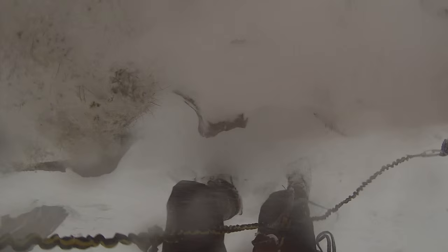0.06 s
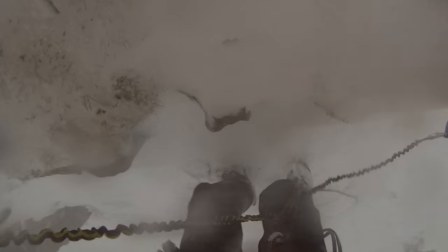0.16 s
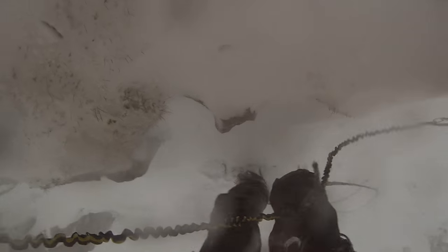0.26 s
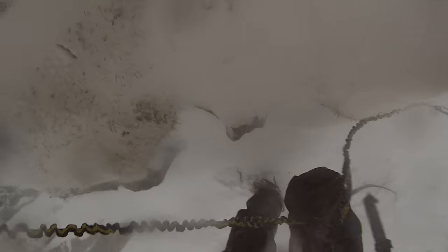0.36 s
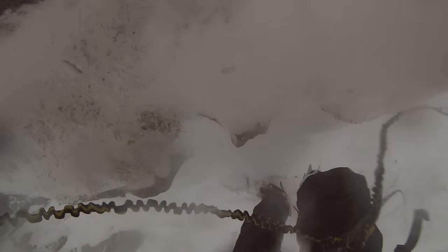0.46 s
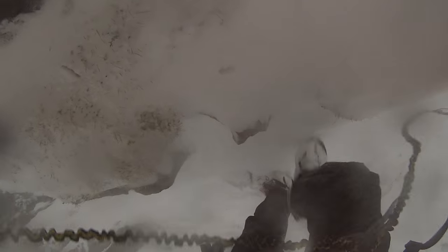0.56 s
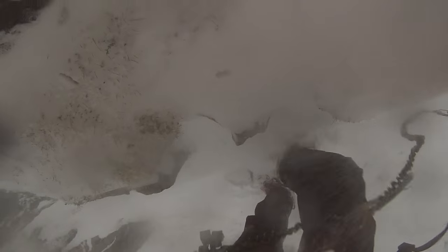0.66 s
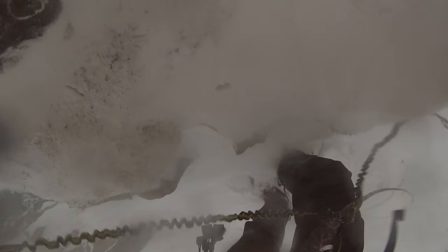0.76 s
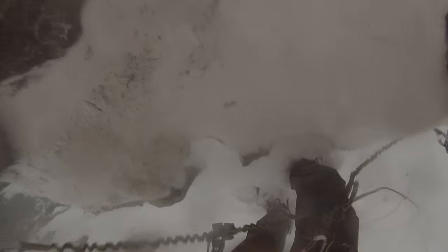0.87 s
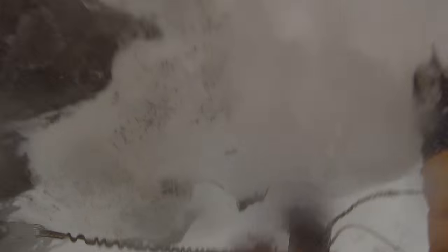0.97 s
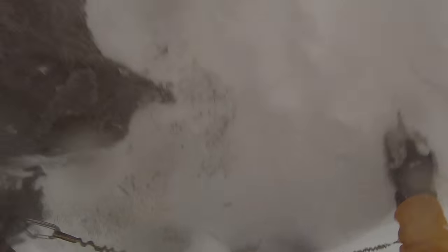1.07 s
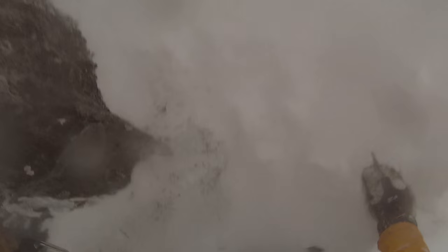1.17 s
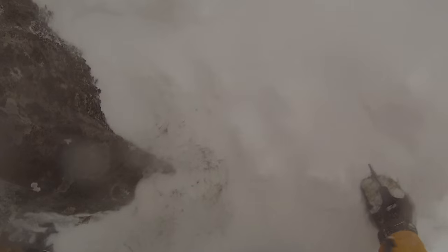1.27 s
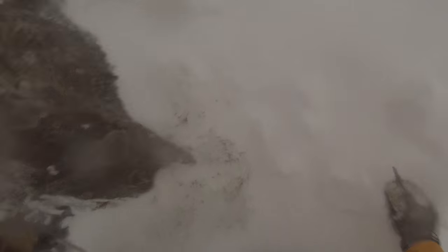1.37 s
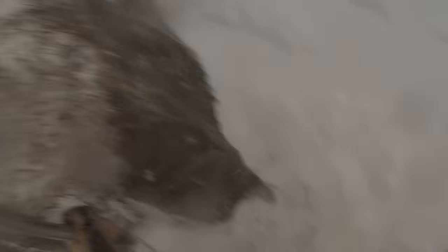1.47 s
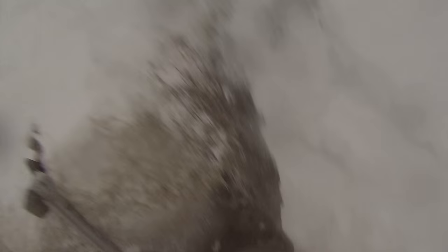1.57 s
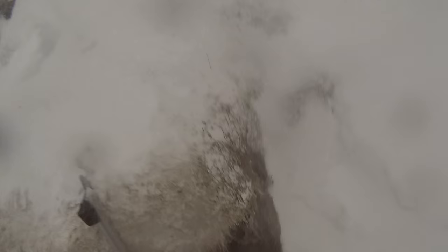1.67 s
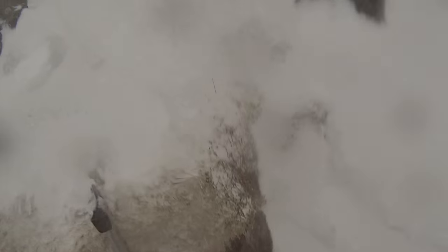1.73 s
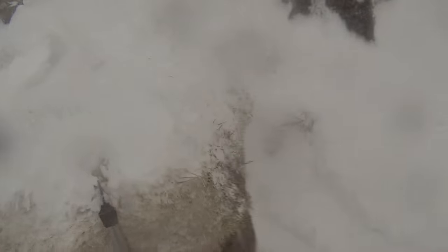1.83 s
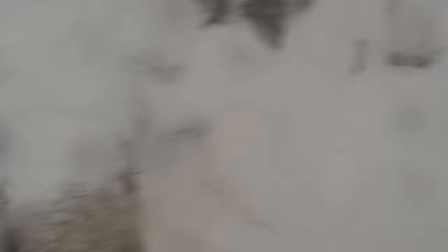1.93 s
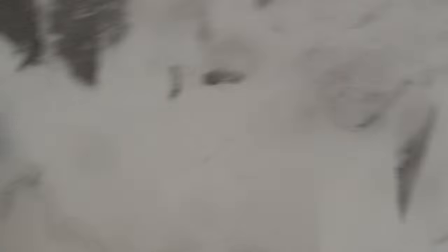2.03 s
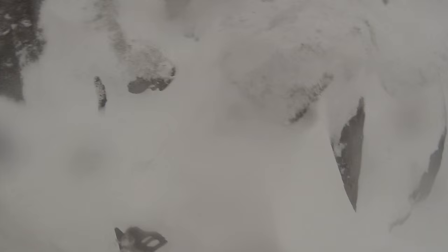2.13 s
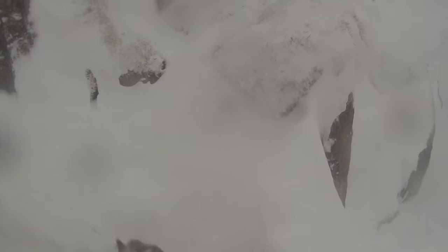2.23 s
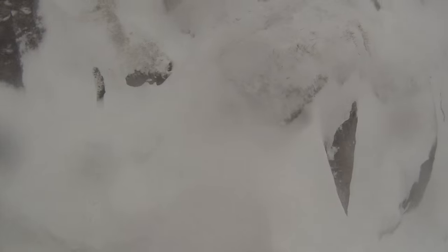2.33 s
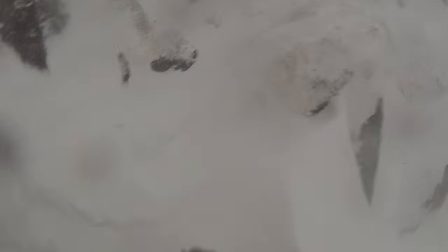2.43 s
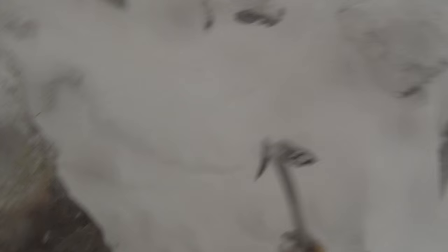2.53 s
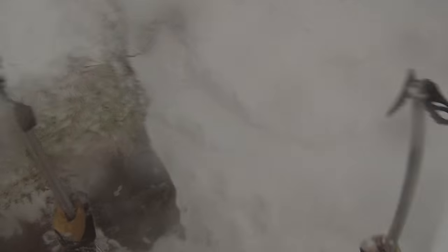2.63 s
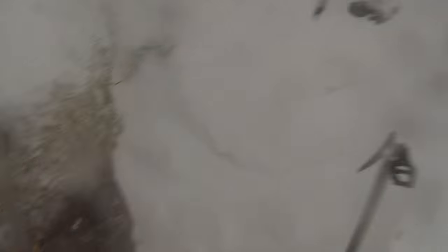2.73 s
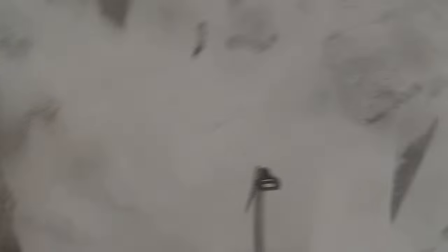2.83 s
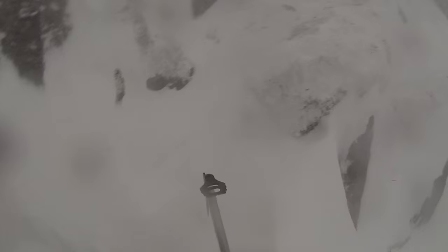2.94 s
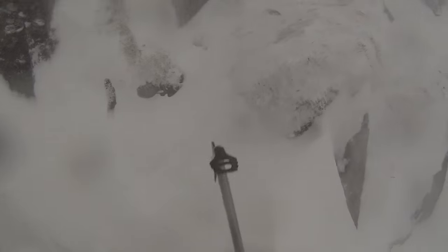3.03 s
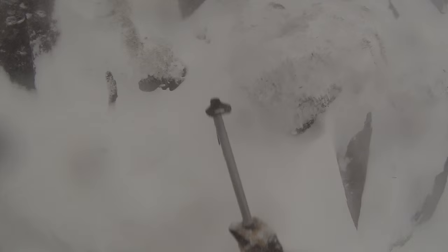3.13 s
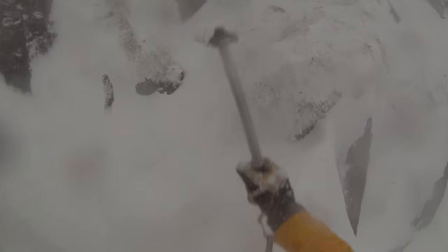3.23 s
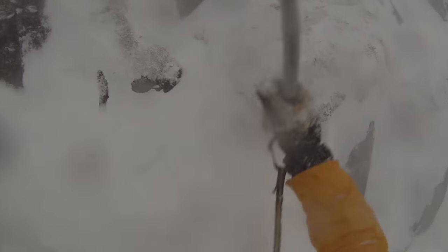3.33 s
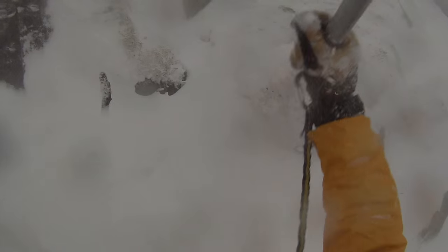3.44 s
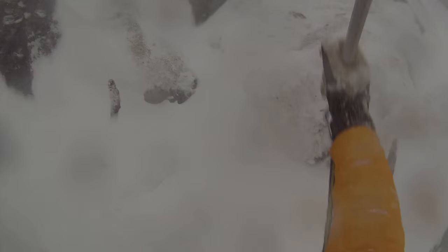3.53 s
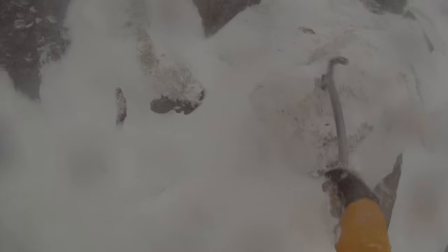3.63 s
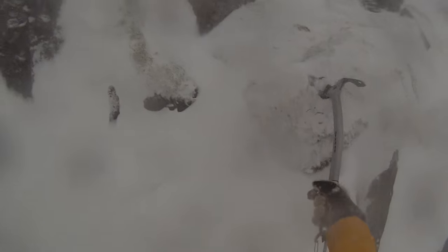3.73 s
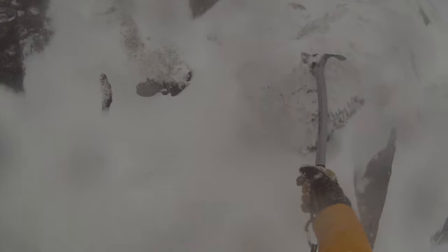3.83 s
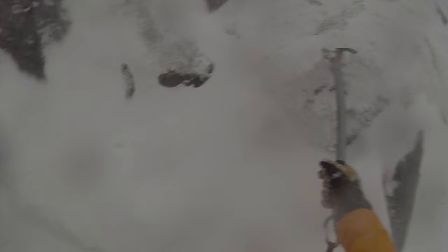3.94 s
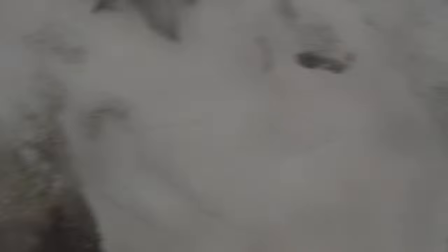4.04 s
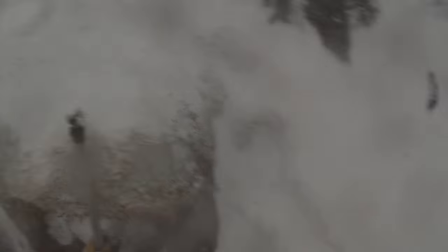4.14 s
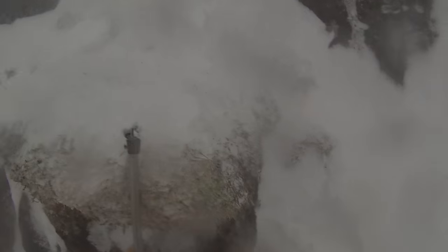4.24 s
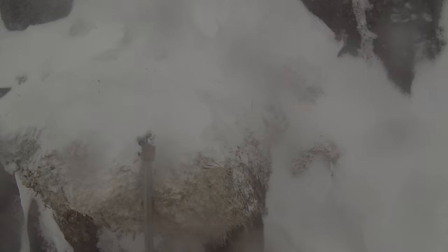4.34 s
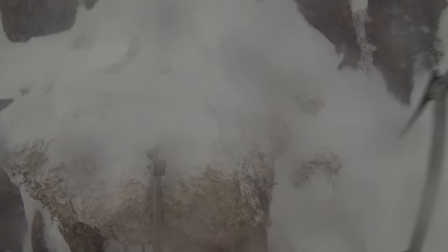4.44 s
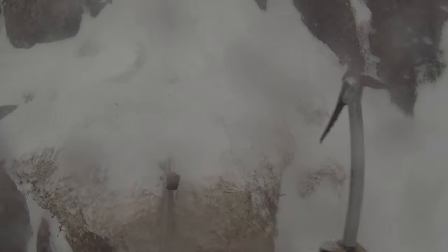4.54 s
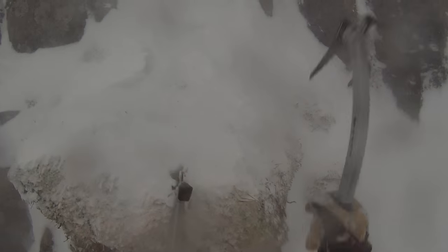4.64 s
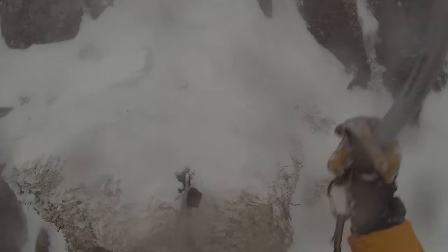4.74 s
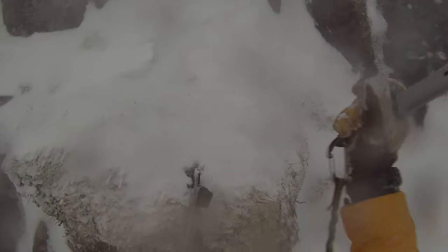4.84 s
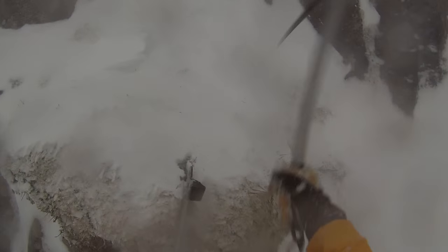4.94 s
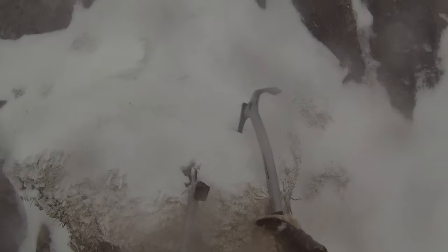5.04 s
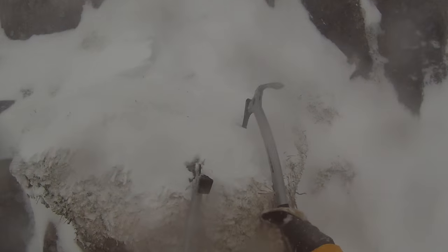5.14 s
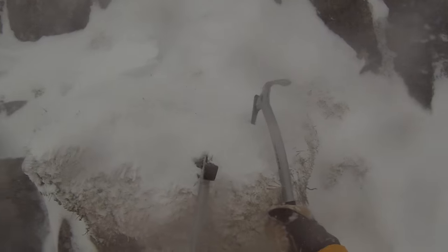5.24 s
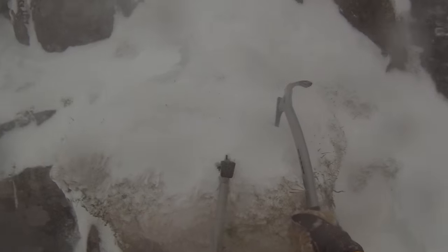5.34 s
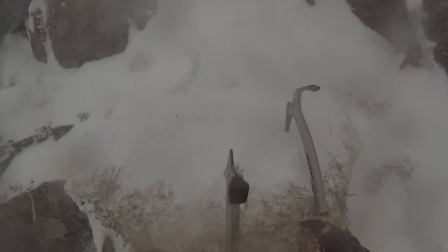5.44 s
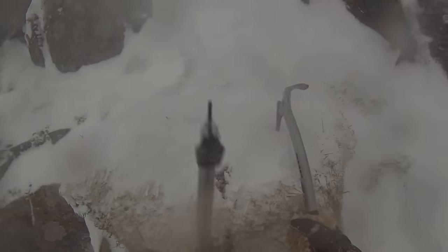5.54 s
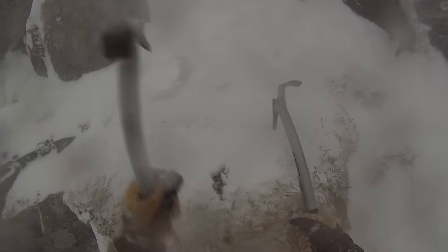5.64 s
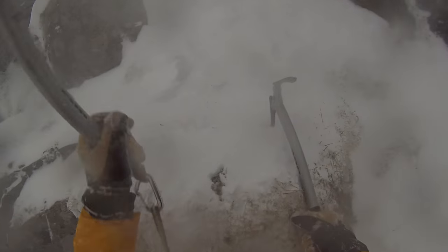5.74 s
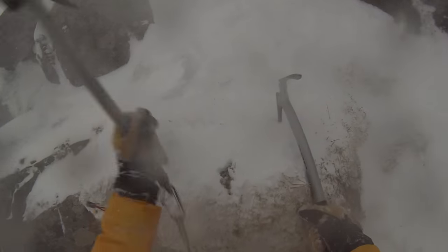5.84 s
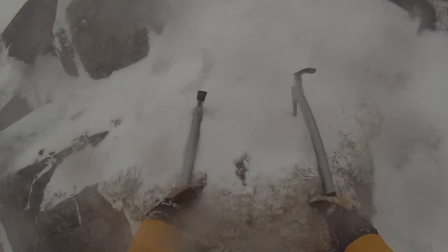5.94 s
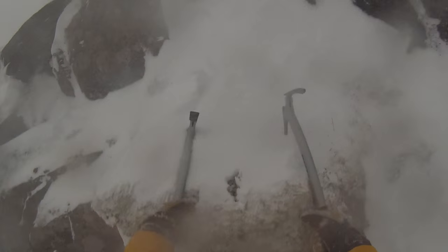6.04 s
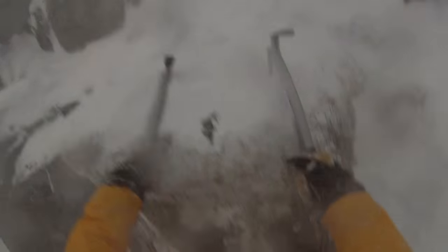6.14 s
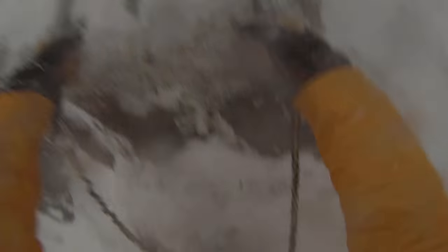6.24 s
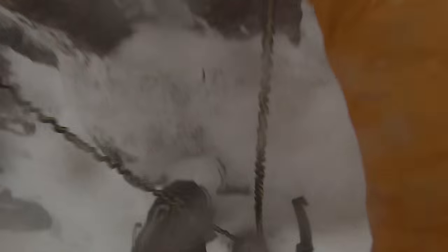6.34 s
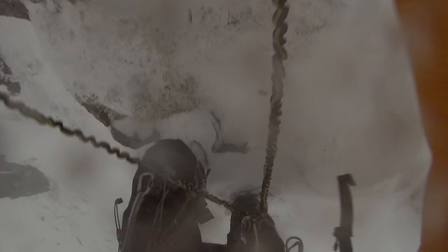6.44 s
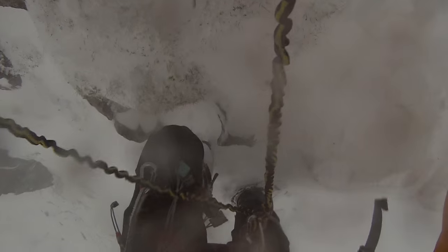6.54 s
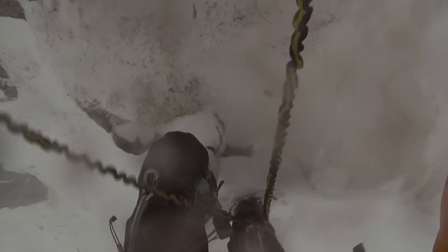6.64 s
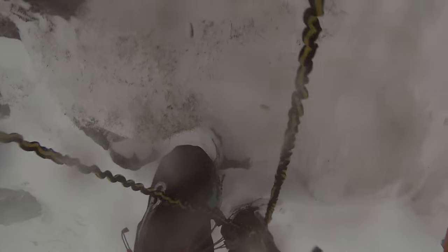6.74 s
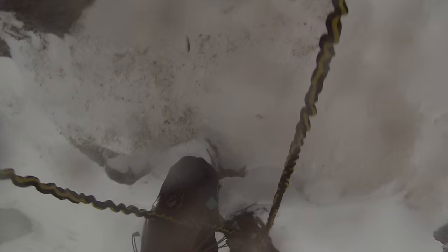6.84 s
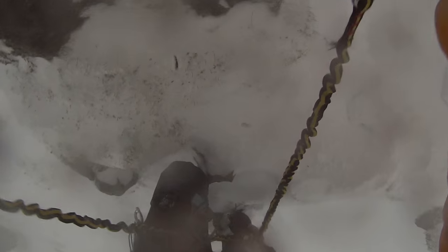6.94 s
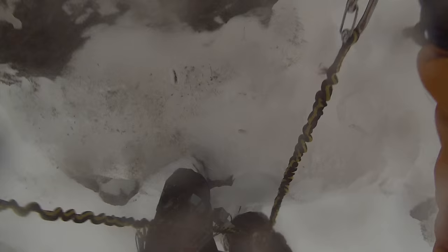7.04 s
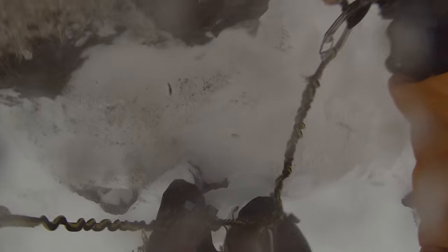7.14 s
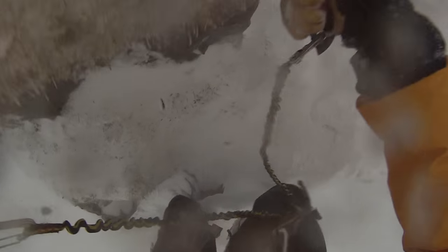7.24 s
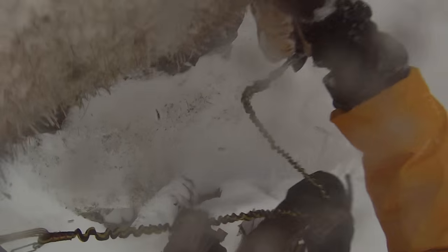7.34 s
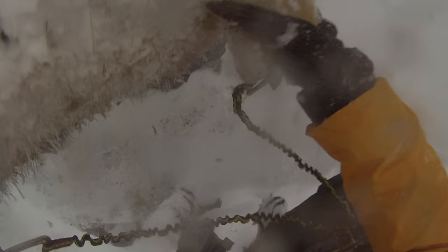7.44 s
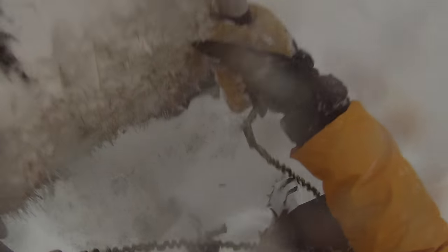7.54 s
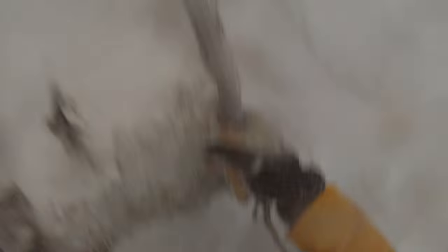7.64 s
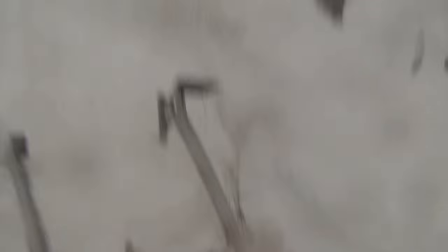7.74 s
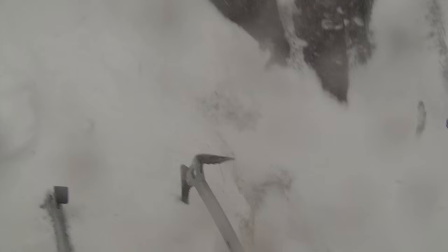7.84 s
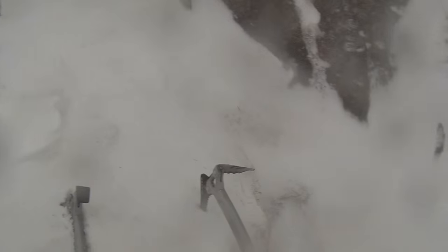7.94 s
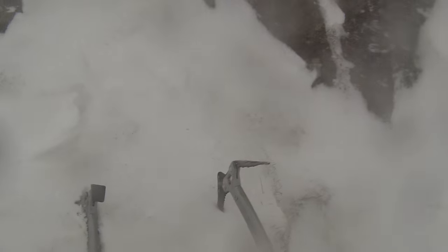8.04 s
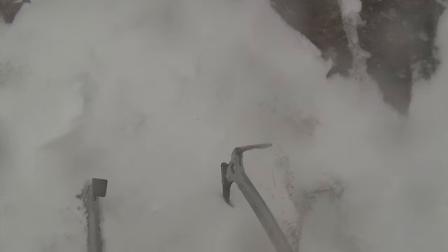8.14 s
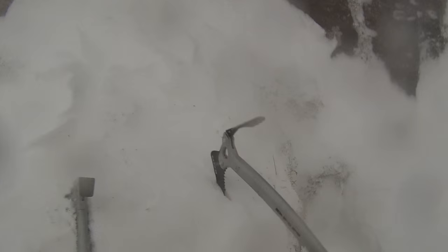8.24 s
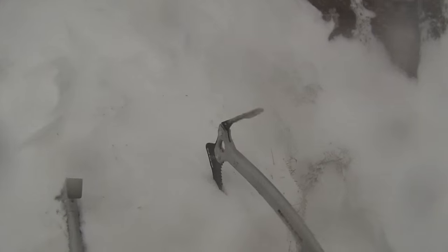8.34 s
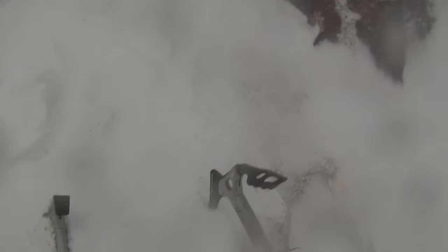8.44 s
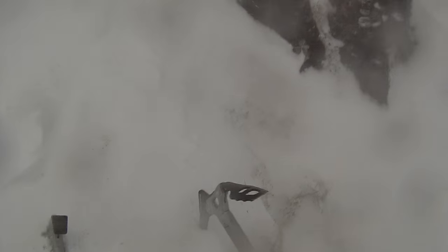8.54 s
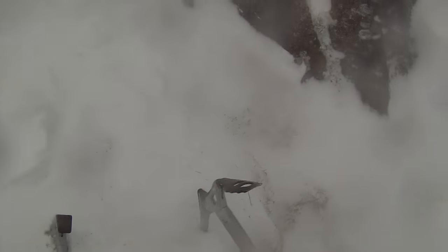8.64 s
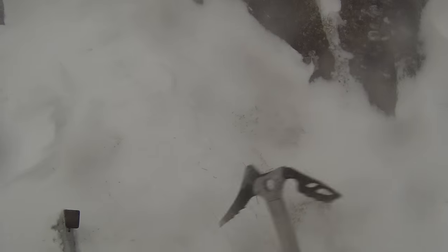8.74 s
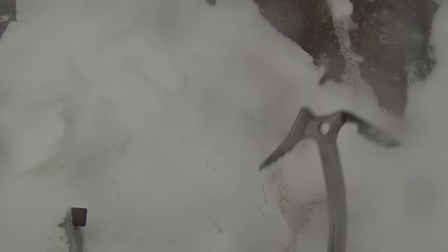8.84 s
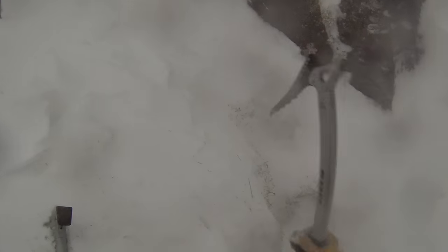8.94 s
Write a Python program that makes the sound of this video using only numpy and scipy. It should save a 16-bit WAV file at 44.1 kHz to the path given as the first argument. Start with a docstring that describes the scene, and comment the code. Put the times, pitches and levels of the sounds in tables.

```python
"""A climber works up frozen snow and turf with two ice axes, heard from a camera worn on the body.
From the start, strokes of crunching snow and stiff cloth (tiny fractures over noise) ride on rumbling wind
(shaped noise), while picks and ice chips click (short ringing modes). Duller blows soon land in the turf
(swelling noise bursts); then jolts and heaves of the body boom in the camera mount near one low note.
The hardest jolt comes two thirds of the way through, and the moves go on to the end."""
import sys
import numpy as np
from scipy import signal
from scipy.fft import rfft, irfft, next_fast_len
from scipy.io import wavfile
from scipy.ndimage import uniform_filter1d, map_coordinates

SR = 44100
rng = np.random.default_rng(int(sys.argv[2]) if len(sys.argv) > 2 else 0)


def inscribe(sig):
    """Save sig as 16-bit PCM at rate SR to the path in sys.argv[1].

    A 1-D sig is mono; a 2-D sig holds one channel per row.
    Samples are clipped to [-1, 1] before scaling.
    """
    pcm = np.round(np.clip(np.atleast_2d(sig).T, -1, 1) * 32767)
    wavfile.write(sys.argv[1], SR, pcm.astype(np.int16))


N = 396900  # samples: 9 s

# Colour of crisp snow, in the strokes and in the crumbling after a click: (frequency [Hz], level [dB])
CRISP_COLOUR = [(1200, -44), (2500, -3.5), (3800, -5.5), (4500, -4.5), (5000, -0.5), (5500, -4),
                (6100, -12), (8000, -12.5), (15300, -20.5)]


def amp(db):
    """Decibels to gain."""
    return 10 ** (np.asarray(db) / 20)


def unit(x):
    """x at rms 1."""
    return x / np.sqrt(np.mean(x ** 2) + 1e-20)


def noise():
    """White noise as long as the scene."""
    return rng.standard_normal(N)


def curves(rows):
    """One value per sample for each column after the time."""
    s, *columns = np.transpose(rows)
    return [np.interp(np.arange(N) / SR, s, column) for column in columns]


def wobble(rate):
    """A smooth random curve, rate knots a second."""
    knots = rng.standard_normal(int(N * rate / SR) + 4)
    return map_coordinates(knots, [np.arange(N) * rate / SR])


def coloured(x, spectrum):
    """x through a causal minimum-phase filter with the given (Hz, dB) points, at rms 1."""
    m = 2 * next_fast_len(N // 2 + 8192)
    hz, db = np.transpose(spectrum)
    gain = amp(np.interp(np.log(np.fft.rfftfreq(m, 1 / SR) + 1), np.log(hz), db))
    # folding the cepstrum onto positive time makes the filter causal
    cepstrum = irfft(np.log(gain))
    cepstrum[1:m // 2] *= 2
    cepstrum[m // 2 + 1:] = 0
    response = np.exp(rfft(cepstrum))
    return unit(irfft(rfft(x, m) * response)[:N])


def add(track, s, sound):
    """Mix a sound into the track at s seconds."""
    start = round(s * SR)
    track[start:start + len(sound)] += sound[:N - start]


def swell(start, length, attack_s, t60):
    """Envelope of one movement: it rises, holds and dies away."""
    age = np.arange(N) / SR - start
    rise = np.clip(age / attack_s, 0, 1)
    return rise * amp(-60 * np.maximum(age - length, 0) / t60)


def effort():
    """Body, crisp and sparkle levels [dB] before trim: strokes add in power to the blown snow."""
    # Strokes of boot, pick or sleeve over the snow: (start [s], length [s], body level [dB],
    # crispness over the body [dB], sparkle over the crispness [dB])
    strokes = [(-0.068, 0.091, -39.5, 2.2, -6), (0.036, 0.15, -53, 3.5, -4), (0.43, 0.069, -53.5, 7, 2.5),
               (0.7, 0.12, -62, -2, 4), (0.82, 0.27, -52, 2, -3.5), (1.037, 0.28, -46.5, 0.4, -3),
               (1.396, 0.1, -43.5, 0.8, -11), (1.467, 0.18, -48, -4, -2.6), (1.701, 0.11, -49, 2, -7),
               (1.778, 0.18, -54.5, -3, -0.5), (1.94, 0.292, -48.5, -5, 0), (2.243, 0.23, -41, -0.5, -3),
               (2.453, 0.21, -48, 0, -4.5), (2.668, 0.201, -39.5, -3, -2), (2.931, 0.081, -36, -3.5, 1),
               (3.097, 0.091, -38, -3.5, -0.1), (3.192, 0.087, -41, -0.5, 0),
               (3.282, 0.091, -41, -2.5, 5.5), (3.363, 0.21, -47.3, -6.4, -3), (3.501, 0.2, -38, -2.5, 0),
               (3.72, 0.18, -42, -0.5, -1.5), (3.846, 0.15, -36, -5.5, 3), (3.976, 0.098, -43, -4.1, -3.2),
               (4.082, 0.26, -46.5, -0.5, -1), (4.388, 0.29, -43, -2.2, 1.3), (4.526, 0.19, -37, -5, 0),
               (4.698, 0.14, -46.5, -7.5, -0.5), (4.879, 0.19, -46, -2.5, -2.5),
               (5.088, 0.26, -48.5, 0.3, -3.5), (5.294, 0.17, -48, 1.5, -3), (5.431, 0.14, -41, -0.1, -1.2),
               (5.593, 0.14, -44, 2.2, -1.5), (5.73, 0.17, -47, 2.2, -3.5),
               (5.924, 0.18, -43.5, -1.2, -2.2), (6.08, 0.22, -54, 2, -2), (6.19, 0.17, -45.5, -2, -5.5),
               (6.31, 0.19, -56, 1.8, -5), (6.558, 0.77, -55.5, 5.5, -6.5), (6.91, 0.29, -51, 0.2, -0.5),
               (7.135, 0.11, -50.0, -13.8, -12), (7.267, 0.14, -47, 0.6, -4), (7.418, 0.08, -50, 2, -6),
               (7.586, 0.2, -52.5, -0.8, -3), (7.672, 0.22, -50, -1, -5), (7.992, 0.24, -46, -2.5, -1.5),
               (8.25, 0.044, -32.5, -4.5, -2), (8.437, 0.16, -49.5, -0.5, -2),
               (8.636, 0.066, -37.5, -4.5, 1), (8.74, 0.14, -35.5, -4.5, 0.5), (8.897, 0.103, -43, -7, -21)]
    # Faint hiss of blown snow under the strokes: (time [s], level [dB])
    drift = [(0, -60), (6.2, -60), (6.6, -64), (9, -64)]
    drift_db, = curves(drift)
    drift_steps_db = [0, -5, -3]  # body, crispness over it, sparkle over that
    power = amp(np.cumsum(drift_steps_db))[:, None] ** 2 * amp(drift_db) ** 2
    for start, length, *steps_db in strokes:
        envelope = swell(start, length, attack_s=0.091, t60=0.25)
        power += amp(np.cumsum(steps_db))[:, None] ** 2 * envelope ** 2
    return 10 * np.log10(power)


def slips(rate, settle_s):
    """Stick-slip strength, mean 0 and rms 1: it jumps at each slip and then settles."""
    kicks = (rng.random(N) < rate / SR) * rng.uniform(0.15, 1, N)
    stress = signal.lfilter([1], [1, -np.exp(-1 / (settle_s * SR))], kicks)
    return unit(stress - np.mean(stress))


def grains(rate, spread_db, low_hz, high_hz, life):
    """Tiny fractures at random moments, each at its own pitch: many weak, a few strong."""
    when, pitch, strength, phase = rng.random((int(rate * N / SR), 4)).T[:, :, None]
    k = np.arange(128)
    age = k / SR / life  # in lifetimes; life is in seconds
    size = amp(spread_db * np.minimum(-np.log(1 - strength), 5))
    hz = low_hz + pitch * (high_hz - low_hz)
    wave = size * age * np.exp(-age) * np.sin(2 * np.pi * (hz * k / SR + phase))
    places = (when * N).astype(int) + k
    return unit(np.bincount(places.ravel(), wave.ravel(), N)[:N])


def patchy(x, depth_db, size):
    """Each clump of snow has its own colour: random gains smoothed over (170 Hz bins, 3 ms steps)."""
    z = signal.stft(x, nperseg=256)[2]
    field = uniform_filter1d(rng.standard_normal(z.shape), size[0], axis=0)
    field = uniform_filter1d(field, size[1], axis=1)
    return unit(signal.istft(z * amp(depth_db * unit(field)), nperseg=256)[1][:N])


def crunch(body_db, crisp_db, sparkle_db):
    """Snow crystals break in clumps over the smooth hiss of sliding cloth and blown snow."""
    # Colour of the crunch's body: (frequency [Hz], level [dB])
    body_colour = [(150, -43), (300, -18), (550, -18.5), (870, -21.5), (1030, -6), (1180, -13.5), (1370, 0),
                   (1900, 0), (2300, -3), (3200, -10), (4500, -9.5), (8000, -41)]
    # Colour of the finest crystals: (frequency [Hz], level [dB])
    sparkle_colour = [(4000, -23), (6200, -1.5), (7200, 1.5), (8400, -7.5), (9800, -4.5), (11000, -1),
                      (12300, -8.5), (13800, -11), (15300, -26)]
    # under a hard push the fractures merge into a rush; in light moves they stand out singly
    apart = amp(-.25 * (body_db - np.mean(body_db)))
    clumps_db = apart * (1.28 * slips(rate=90, settle_s=0.0072) + 1.03 * wobble(24))
    coarse = grains(rate=850, spread_db=3.5, low_hz=880, high_hz=4300, life=0.00038)
    fine = grains(rate=1500, spread_db=4.5, low_hz=2900, high_hz=15700, life=0.00008)
    dust = grains(rate=1500, spread_db=5.0, low_hz=5740, high_hz=13800, life=.00008)

    body = coloured(apart * coarse + 1.94 * noise(), body_colour)
    crisp = coloured(apart * fine + 0.73 * noise(), CRISP_COLOUR)
    sparkle = coloured(apart * dust + 0.98 * noise(), sparkle_colour)
    body = patchy(body, depth_db=0.7, size=(3, 6))
    crisp = patchy(crisp, depth_db=1.5, size=(6, 7))
    sparkle = patchy(sparkle, depth_db=1.9, size=(8, 10))

    treble = amp(crisp_db - 0.78) * crisp + amp(sparkle_db - 4.0) * sparkle
    treble_slips_db = 1.15 * slips(rate=45, settle_s=0.0042)
    return amp(clumps_db) * (amp(body_db + 0.87) * body + amp(treble_slips_db) * treble)


def surge(spectrum, span_s):
    """Low turbulence with its strength evened out over the given span."""
    x = coloured(noise(), spectrum)
    power = uniform_filter1d(x ** 2, max(int(span_s * SR), 1))
    return x / np.sqrt(np.abs(power) + 0.079)


def wind():
    """Eddies and heaves rumble on the microphone and boom in the mount; soft air follows the wind's boom."""
    # Wind on the camera, before trim and wobble: (time [s], rumble level [dB], mount boom level [dB])
    gusts = [(0, -48.5, -58.5), (.55, -53, -52), (.85, -52, -52), (1.15, -42.5, -45.5), (1.85, -51, -53),
             (2.1, -45, -40), (2.35, -51.5, -52), (2.75, -41, -43.5), (3.45, -48, -49.5),
             (3.85, -44.5, -41.5), (4.3, -44.5, -48.5), (5.7, -47.5, -48.5), (6.05, -44, -45),
             (6.6, -50.5, -54), (7.25, -45.5, -49.5), (7.57, -48, -64), (7.72, -49.5, -50),
             (9, -42.5, -44.5)]
    # Heaves of the body that push air over the microphone: (start [s], length [s], rumble level [dB])
    body_heaves = [(1.02, 0.071, -45), (1.648, 0.05, -37.5), (3.02, .05, -41), (3.684, 0.079, -25.5),
                   (3.844, 0.19, -44.5), (4.98, 0.097, -48), (5.049, 0.13, -38), (5.784, 0.11, -40),
                   (6.005, 0.1, -32), (6.273, 0.12, -41), (7.66, 0.14, -38.5), (7.792, .06, -36)]
    # Colours of the rumble, the mount's boom and the rush of air: (frequency [Hz], level [dB])
    rumble_colour = [(10, -5.5), (28, 5.5), (50, -4), (80, -6), (140, -16.5), (400, -64.5)]
    boom_colour = [(40, -38.5), (75, -6), (95, -3.5), (115, -0.5), (132, -1.5), (165, -17), (230, -21),
                   (275, -36.5), (370, -29), (600, -42), (1500, -57)]
    air_colour = [(100, -1.5), (300, -1), (500, -5), (850, -2), (1050, -3), (3000, -9.5), (12000, -41)]

    rumble_db, boom_db = curves(gusts)
    heave = sum(amp(db) * swell(start, length, attack_s=0.031, t60=0.23)
                for start, length, db in body_heaves)
    rumble = np.hypot(amp(rumble_db - 2.5 + 1.4 * wobble(12)), heave)
    mount_share = amp(-15)  # the mount takes up a share of each heave
    boom = np.hypot(amp(boom_db - 2.5 + 3.5 * wobble(16)), mount_share * heave)
    air_db = -60.5 + 0.42 * (boom_db - np.mean(boom_db)) + 2.05 * wobble(25)
    air = amp(air_db) * coloured(noise(), air_colour)
    return air + rumble * surge(rumble_colour, span_s=0.19) + boom * surge(boom_colour, span_s=0.061)


def chips(level_db):
    """Loose ice chips click at random moments, their level following the stroke under way."""
    per_second, over_stroke_db, scatter_db = 7, 2, 0.5
    contacts = []
    for at, pitch, *colour in rng.random((int(per_second * N / SR), 5)):
        scatter = scatter_db * (2 * np.array(colour) - 1)
        levels_db = level_db[int(at * N)] + over_stroke_db + scatter  # clack, ping, snap
        contacts.append((at * N / SR, *levels_db, 3500 + 1700 * pitch))
    return contacts


def ring(modes, t, tuning, attack):
    """One contact rings the modes, all scaled in pitch by tuning; its energy is that of rms 1 over 4 ms."""
    x = sum(amp(db - 60 * t / t60) * np.sin(2 * np.pi * (hz * tuning * t + rng.random()))
            for hz, db, t60 in modes)
    x = x * (1 - np.exp(-(t / attack) ** 2))
    return x / np.sqrt(np.sum(x ** 2) / (.004 * SR))


def clicks(stroke_crisp_db):
    """Steel bites ice: a brief ring, then a puff of crumbling crystals."""
    # Hard contacts of steel and ice:
    # (time [s], clack level [dB], ping level [dB], snap level [dB], ping pitch [Hz])
    axe_contacts = [(0.0337, -56.5, -40, -39, 3720), (0.0756, -34.5, -44, -45, 4000),
                    (0.212, -54, -44, -57, 5200), (0.2808, -58, -48, -63, 4630),
                    (0.5866, -67, -34, -60, 4970), (1.2765, -31, -36, -66, 3690),
                    (1.3856, -42, -45, -53, 5180), (1.4567, -38, -36, -40, 3740),
                    (1.8021, -37, -45, -62, 3820), (1.8615, -49, -60, -58, 3840),
                    (2.3943, -40, -39, -38, 4180), (2.4535, -39, -50, -58, 4000),
                    (2.5165, -33, -56, -57, 4880), (2.616, -36.5, -54, -55, 4310),
                    (2.7656, -25.5, -19.5, -36, 4170), (2.9255, -40, -47, -40.5, 4010),
                    (2.9561, -28.5, -47, -39, 4330), (2.9836, -37, -36, -53, 3940),
                    (3.0254, -37, -35, -37, 4910), (3.1038, -37.5, -40.5, -49, 4100),
                    (3.1252, -40, -39.5, -49, 4900), (3.5792, -30.5, -30.5, -34, 4200),
                    (3.6891, -27, -31, -48, 3760), (3.6915, -37, -33, -48, 3280),
                    (3.8178, -34, -44, -32.5, 4350), (3.8331, -28, -41, -39, 4750),
                    (3.9065, -33, -36, -36.5, 4050), (4.0426, -36, -36.5, -41, 4060),
                    (4.218, -38, -37, -37.5, 3580), (4.4803, -38, -34, -38, 4630),
                    (4.7036, -38, -23, -33, 5100), (4.9171, -40, -38.5, -47, 4850),
                    (5.0395, -35, -35, -53, 3450), (5.1459, -41, -41, -46, 4080),
                    (5.411, -33, -51, -39, 4820), (5.6842, -54, -25.5, -42, 5000),
                    (5.8312, -25.5, -32, -33.5, 3780), (6.6123, -52, -36, -42, 3060),
                    (6.755, -34, -36.5, -37, 5040), (7.4901, -40.5, -40, -53, 5170),
                    (7.5312, -40, -49, -48, 3380), (7.8264, -37, -38, -49, 4940),
                    (8.2874, -32, -39, -38, 3810), (8.2976, -34, -44, -33, 4390),
                    (8.3345, -35, -42, -42.5, 3720), (8.588, -43.5, -39.5, -51, 5360),
                    (8.9602, -33, -25, -38, 4860), (8.964, -45, -37, -36.5, 3480),
                    (8.9733, -32.5, -36, -47, 4000)]
    # Ringing of a contact in three registers, low to high: (frequency [Hz], relative level [dB], t60 [s])
    clack_modes = [(1460, -10, 0.025), (2000, 7.5, 0.0026), (2380, 7, 0.0014)]
    ping_modes = [(4000, -6, 0.00033), (4660, -11, 0.0067), (5600, -1.5, 0.0018)]
    snap_modes = [(7200, 1, 0.0041), (9300, 0, 0.0053), (11350, 9.5, 0.0025), (13300, -37, .002)]

    rings, crumble, t = np.zeros(N), np.zeros(N), np.arange(SR // 20) / SR
    for s, clack_db, ping_db, snap_db, ping_hz in axe_contacts + chips(stroke_crisp_db):
        # each contact shifts the ring a little; the ping pitch is that of its middle mode
        clack = amp(clack_db) * ring(clack_modes, t, 1 + rng.uniform(-0.066, 0.097), attack=0.00015)
        ping = amp(ping_db) * ring(ping_modes, t, ping_hz / ping_modes[1][0], attack=0.000071)
        snap = amp(snap_db) * ring(snap_modes, t, 1 + rng.normal(0, 0.093), attack=0.00021)
        hit = clack + ping + snap
        add(rings, s, hit)
        add(crumble, s, np.max(np.abs(hit)) * amp(-21.0 - 60 * t / 0.026))
    crystals = grains(rate=800, spread_db=8, low_hz=2020, high_hz=15000, life=0.000068)
    # so small a contact radiates almost no bass
    thin = signal.butter(4, 1100, "high", fs=SR, output="sos")
    return signal.sosfilt(thin, rings) + crumble * coloured(crystals, CRISP_COLOUR)


def knock(hz, octaves, swell_s):
    """A rough, hollow burst of band noise with the energy of its envelope, which swells to 1 and fades."""
    t = np.arange(SR // 12) / SR
    edge = 2 ** (np.clip(octaves, .1, 3) / 2)
    band = signal.butter(2, [hz / edge, hz * edge], "band", fs=SR, output="sos")
    shape = t / swell_s * np.exp(1 - t / swell_s)
    settled = signal.sosfilt(band, rng.standard_normal(2 * len(t)))[len(t):]  # skip the filter's onset
    burst = shape * settled
    return burst * np.linalg.norm(shape) / np.linalg.norm(burst)


def blows():
    """Soft ground yields gradually: the crust knocks and the turf under it thuds."""
    # Dull blows in snow and turf: (time [s], knock level [dB], knock pitch [Hz], knock width [octaves],
    # knock swell time [s], thud level [dB], thud pitch [Hz])
    dull_blows = [(0.407, -48.5, 1026, 0.13, 0.0051, -53, 553), (1.228, -50, 1380, 1.2, .006, -54, 400),
                  (1.472, -37.5, 1610, 0.73, 0.0032, -52, 450),
                  (1.64, -38.5, 1790, 0.65, 0.0077, -48.5, 447), (2.057, -55, 720, 0.2, 0.0072, -63, 397),
                  (2.678, -53, 507, 0.47, .0059, -48, 805), (2.994, -49.5, 342, 0.48, 0.0061, -59, 700),
                  (3.688, -26.5, 1545, .3, 0.0021, -56, 750), (4.221, -41, 950, 0.44, 0.0024, -68, 750),
                  (4.632, -49, 740, 0.41, .0045, -60, 600), (4.6614, -20.5, 1770, 0.45, 0.0012, -61, 750),
                  (5.036, -34.5, 1860, .8, 0.0052, -52, 556), (5.408, -34.5, 1600, 0.64, 0.0036, -55, 704),
                  (6.067, -41, 1200, 0.86, 0.0067, -51, 550), (6.091, -24.5, 1830, 0.79, 0.0016, -40, 300),
                  (6.328, -44.5, 1390, 1.3, 0.016, -45.5, 417), (7.066, -41, 1500, .5, 0.0018, -58, 550),
                  (7.756, -39.5, 1430, 0.42, 0.0042, -40.5, 600), (7.79, -49, 1010, 1.4, 0.02, -46.5, 251),
                  (8.809, -46.5, 790, 0.2, .0045, -65, 400)]
    out = np.zeros(N)
    for s, knock_db, hz, octaves, swell_s, thud_db, thud_hz in dull_blows:
        crust = amp(knock_db) * knock(hz, octaves, swell_s)
        turf = amp(thud_db) * knock(thud_hz, octaves=1.27, swell_s=0.0047)
        add(out, s, crust + turf)
    return out


def jolts(mount_hz, t60, attack):
    """A jolt sets the camera mount swinging for a few cycles."""
    # Jolts that reach the mount: (time [s], level before the onset softens it [dB])
    mount_jolts = [(0.927, -30.5), (1.184, -32), (1.251, -31.5), (1.477, -29.5), (1.558, -30),
                   (1.624, -26.5), (1.917, -30), (2.079, -27), (2.199, -33), (2.528, -29.5), (2.689, -33),
                   (2.753, -30), (3.032, -35.5), (3.175, -34), (3.737, -31), (4.156, -31), (4.356, -31),
                   (6.041, -30.5), (6.0916, -5), (6.357, -24.5), (6.461, -32.5), (6.729, -33), (7.02, -32),
                   (7.643, -29.5), (7.759, -31), (7.8022, -19.5), (8.273, -34), (8.582, -33)]
    out, t = np.zeros(N), np.arange(SR // 4) / SR
    envelope = amp(-60 * t / t60) * (1 - np.exp(-t / attack))
    swing = -np.sin(2 * np.pi * mount_hz * t) * envelope
    for s, db in mount_jolts:
        add(out, s, amp(db) * swing)
    return out


def scene():
    """Everything is close and dry: open snow gives no echo."""
    body_db, crisp_db, sparkle_db = effort()
    snow = crunch(body_db, crisp_db, sparkle_db) + blows()
    camera = wind() + jolts(mount_hz=118.3, t60=0.11, attack=0.0022)
    return (snow + camera + clicks(crisp_db))[None]


def record(dry):
    """The camera keeps nothing above its band limit."""
    top_hz = 15600
    m = next_fast_len(N + 8192)
    kept = np.fft.rfftfreq(m, 1 / SR) < top_hz
    return irfft(rfft(dry, m) * kept, m)[..., :N]


dry = scene()
out = record(dry)
inscribe(out)
```